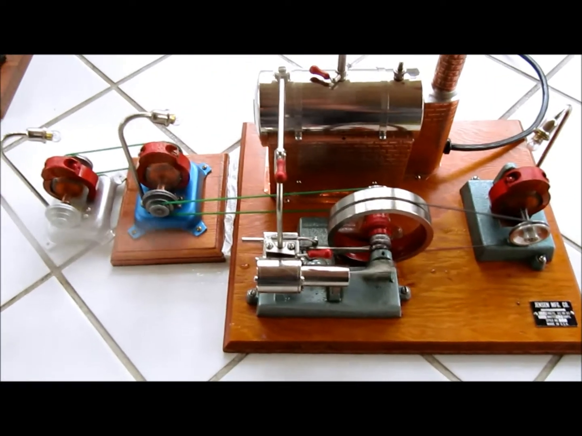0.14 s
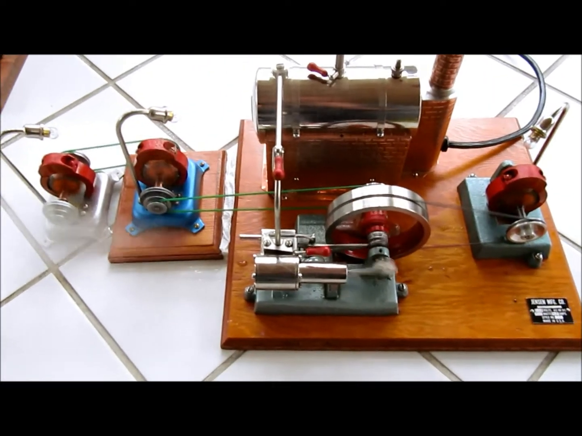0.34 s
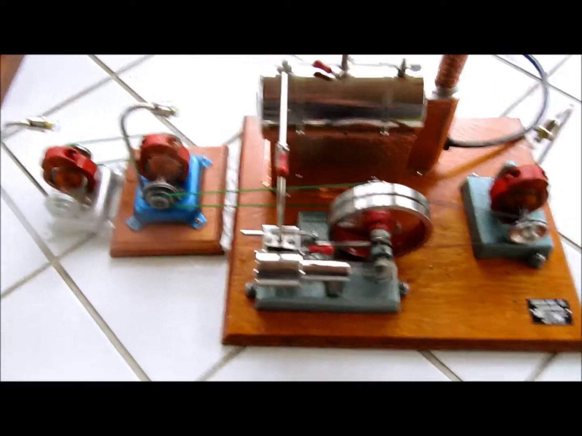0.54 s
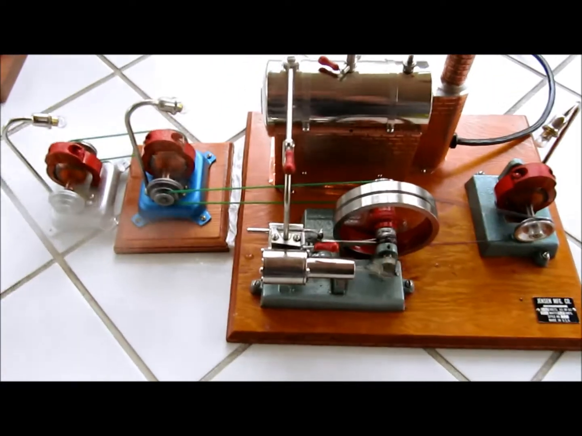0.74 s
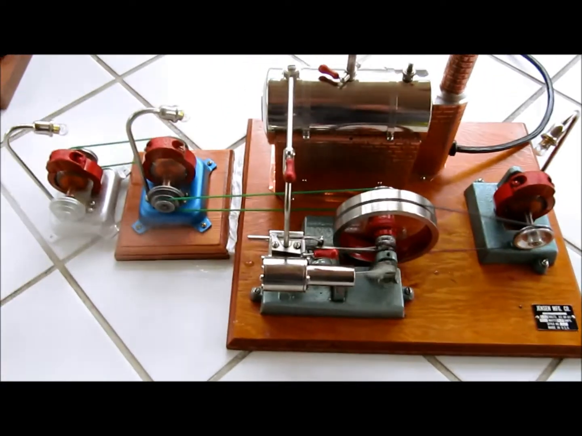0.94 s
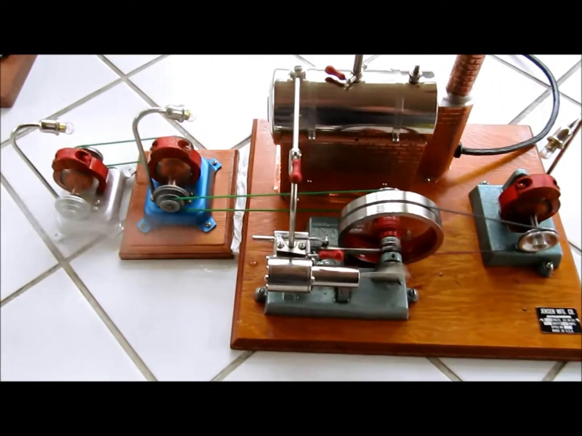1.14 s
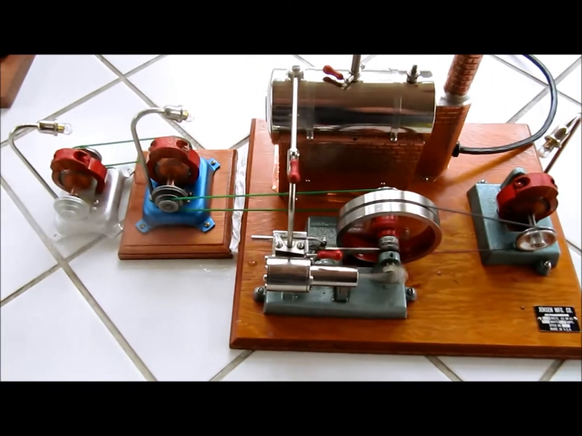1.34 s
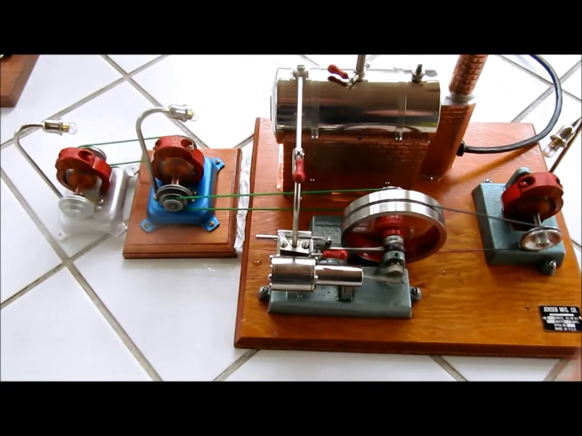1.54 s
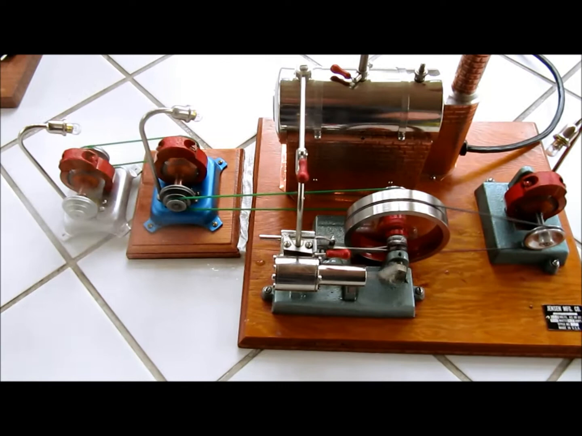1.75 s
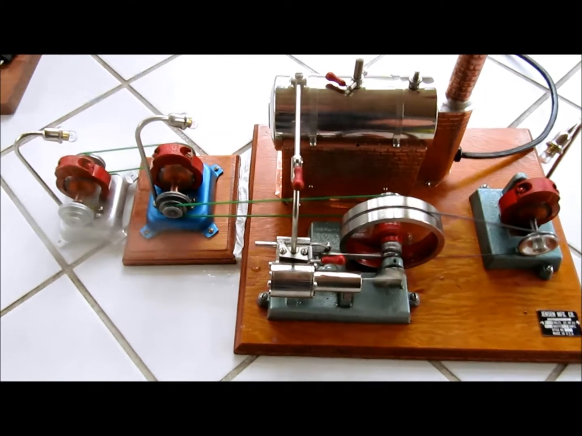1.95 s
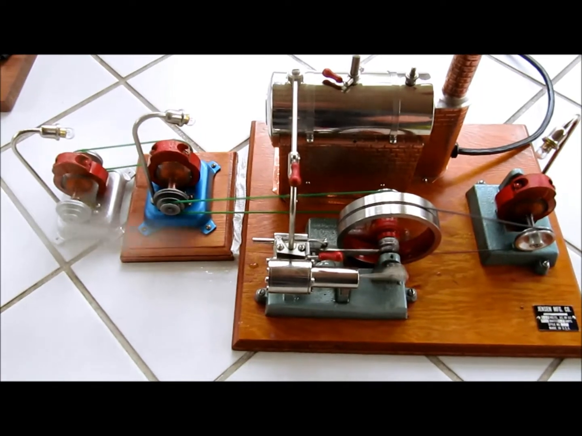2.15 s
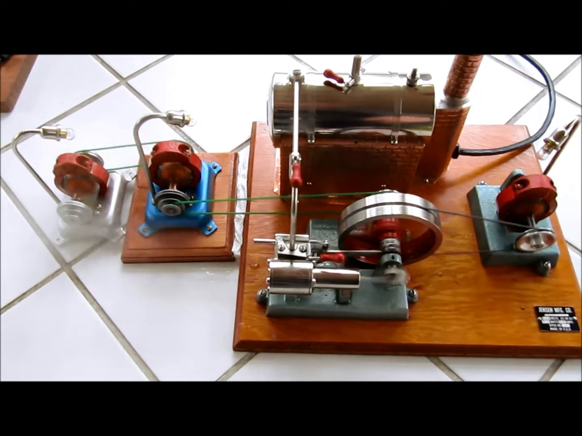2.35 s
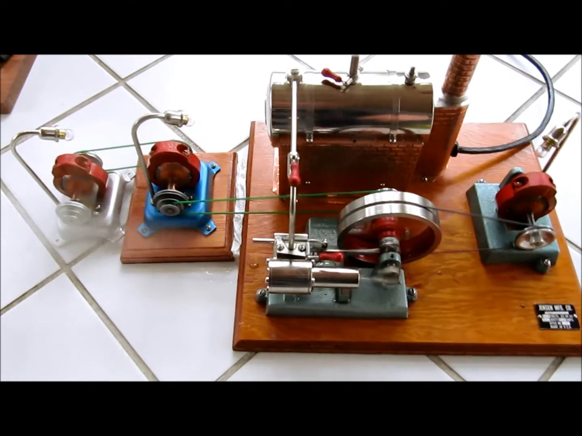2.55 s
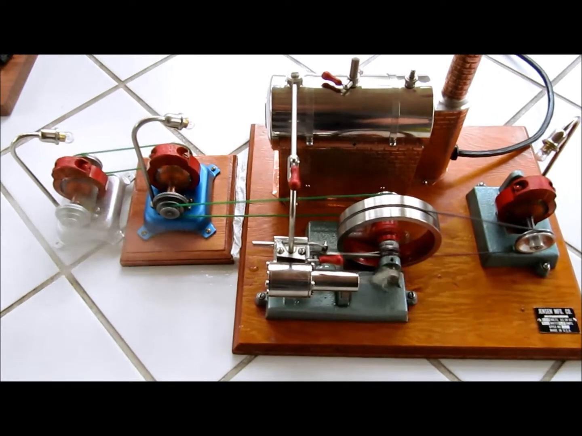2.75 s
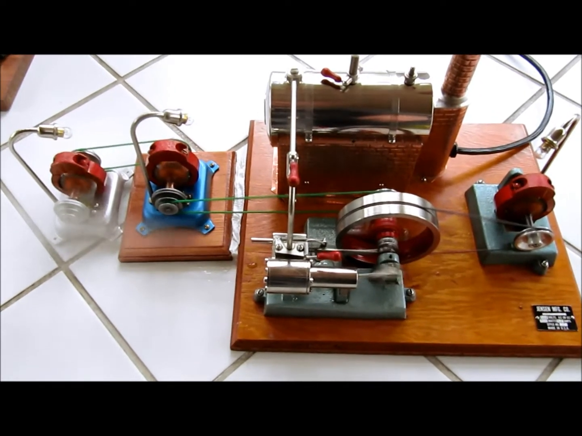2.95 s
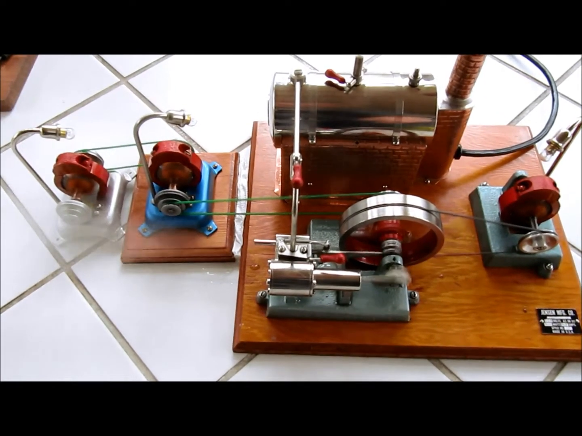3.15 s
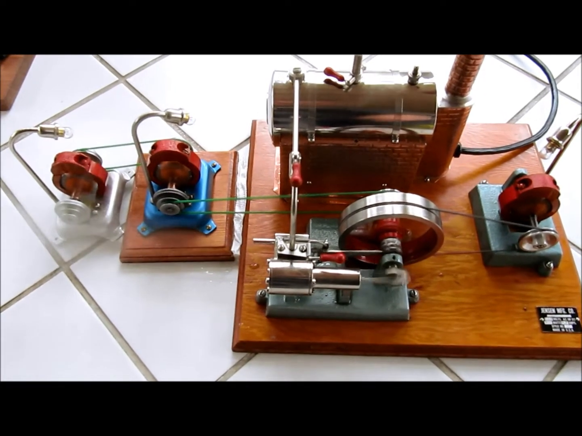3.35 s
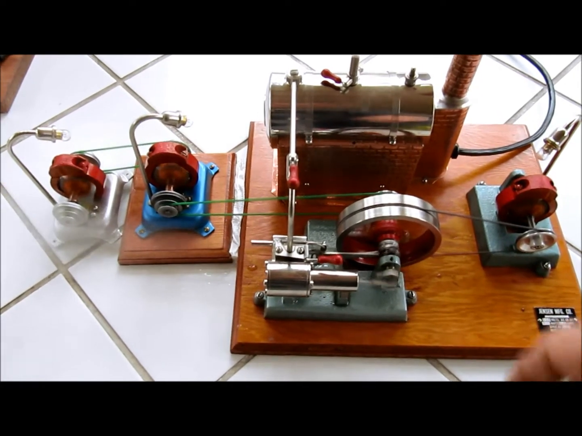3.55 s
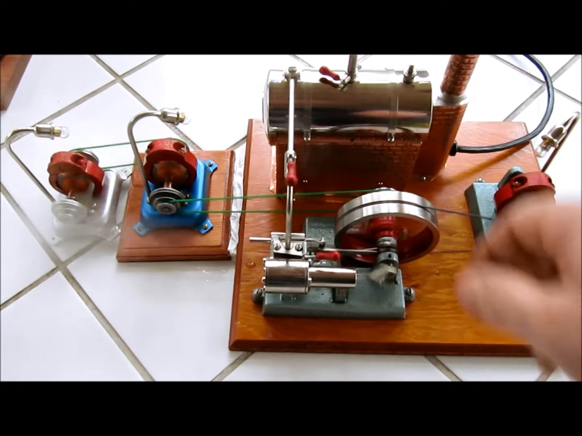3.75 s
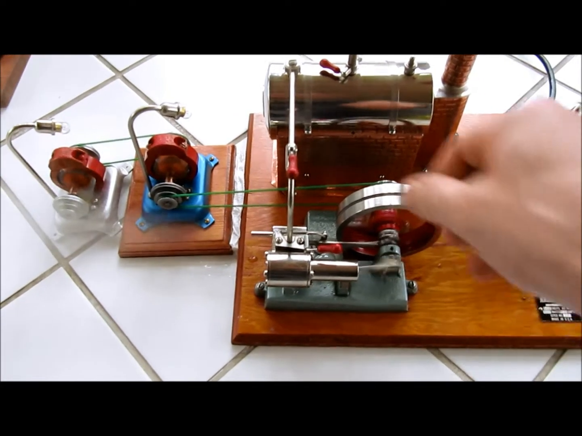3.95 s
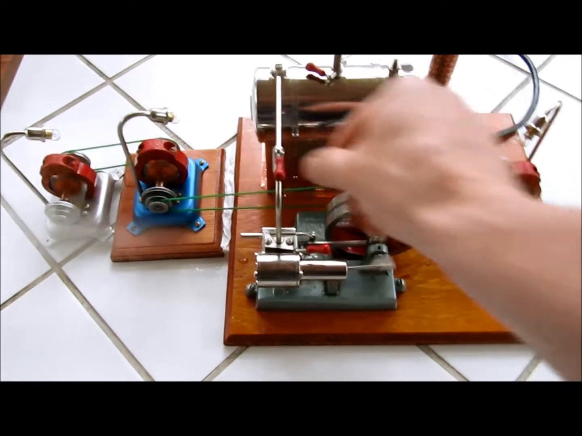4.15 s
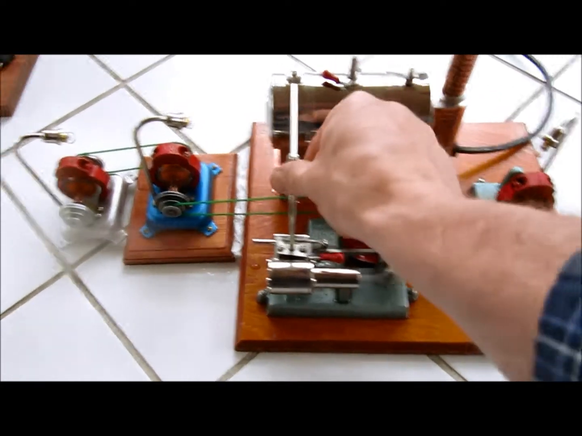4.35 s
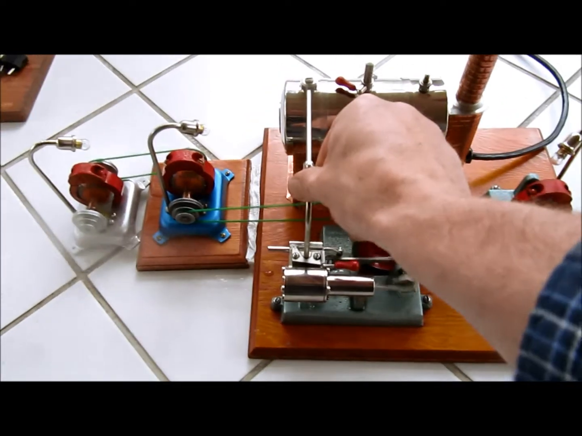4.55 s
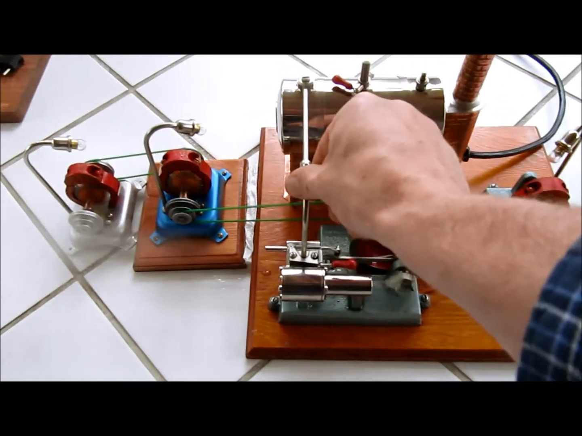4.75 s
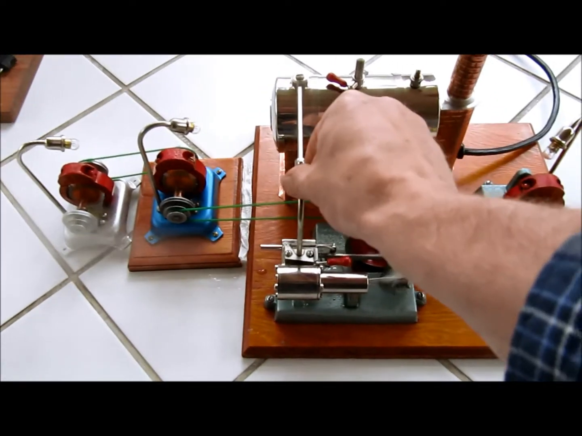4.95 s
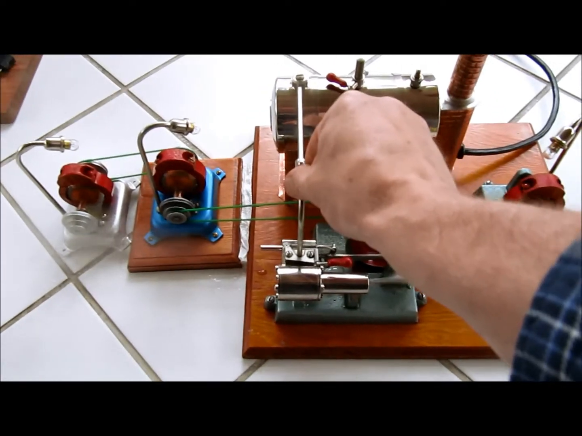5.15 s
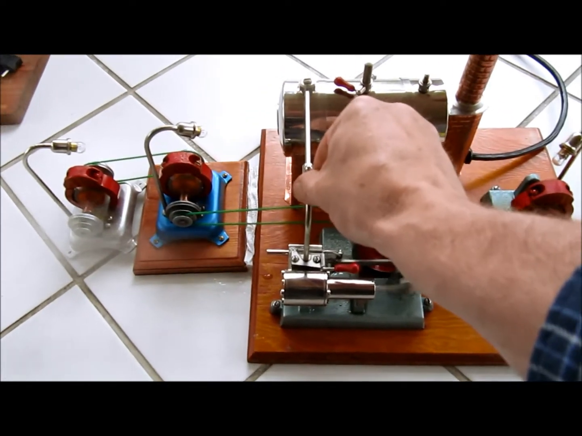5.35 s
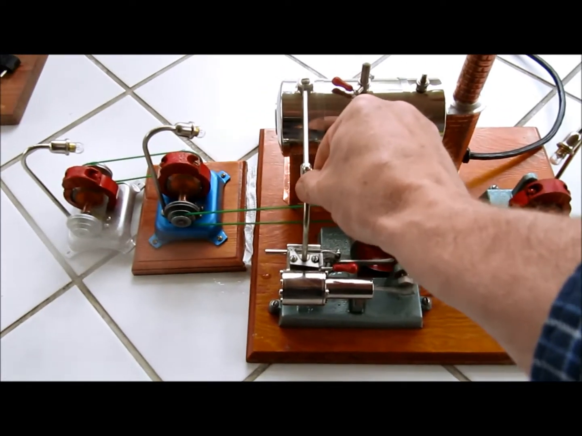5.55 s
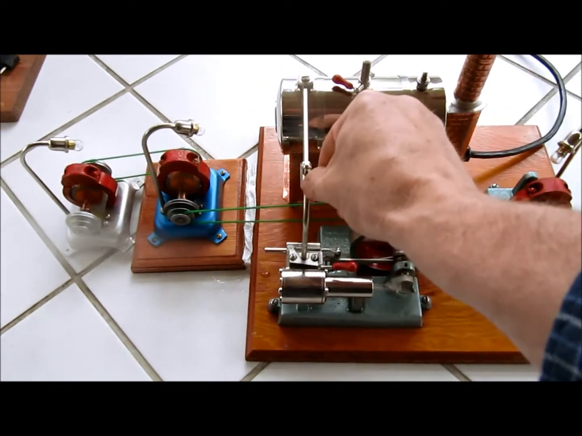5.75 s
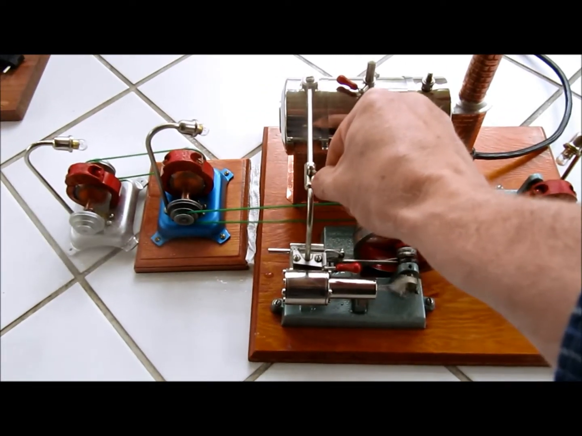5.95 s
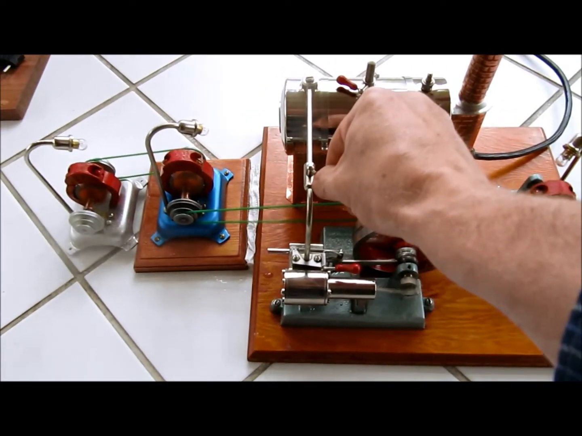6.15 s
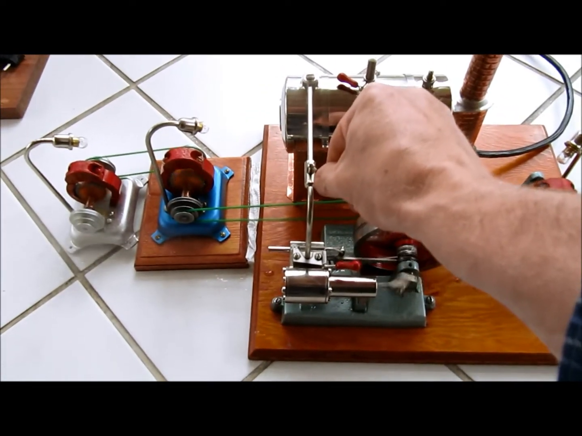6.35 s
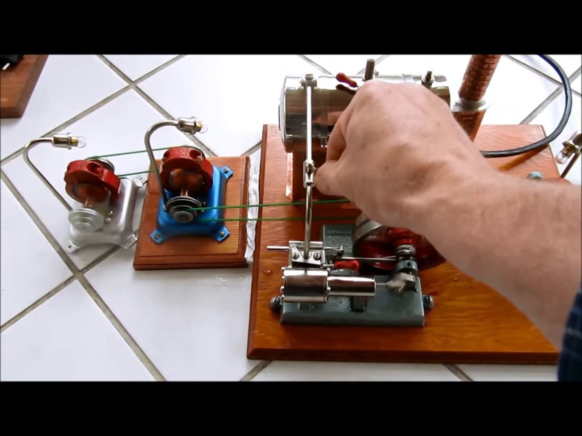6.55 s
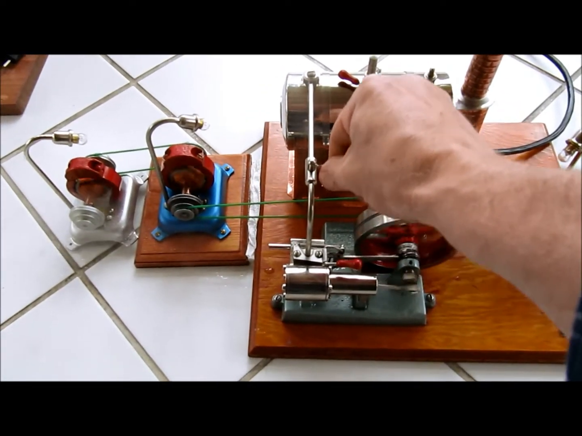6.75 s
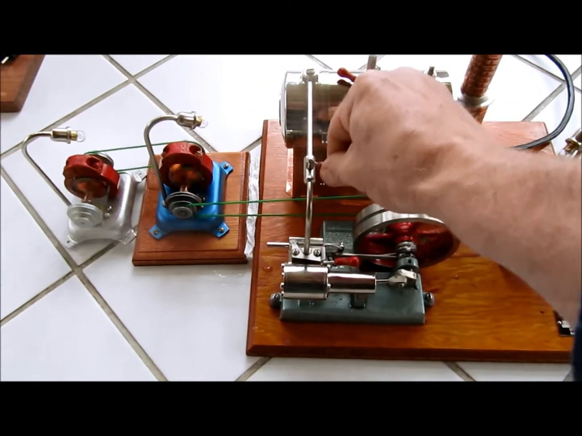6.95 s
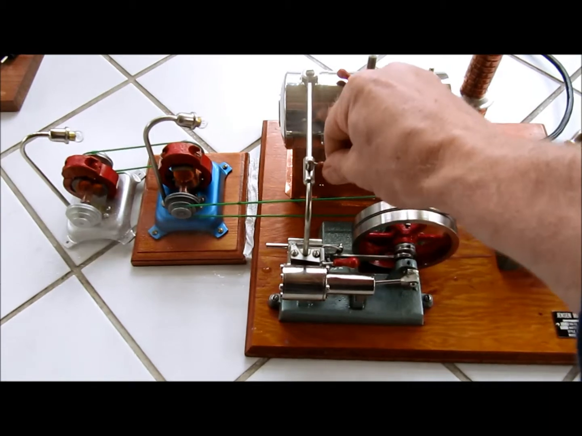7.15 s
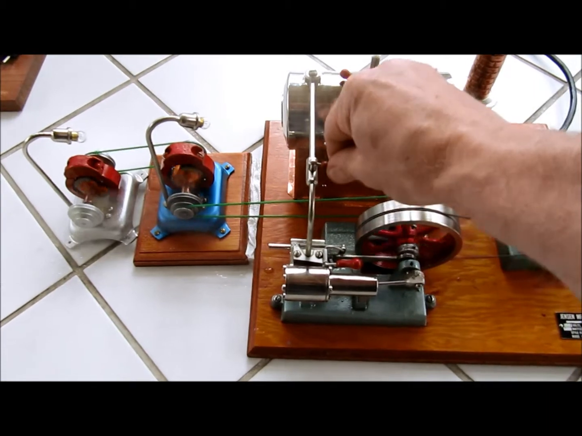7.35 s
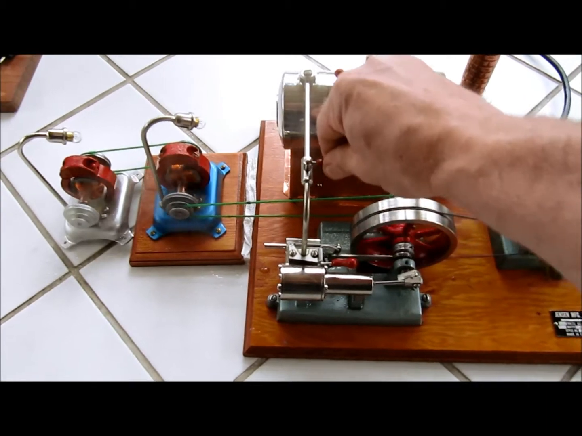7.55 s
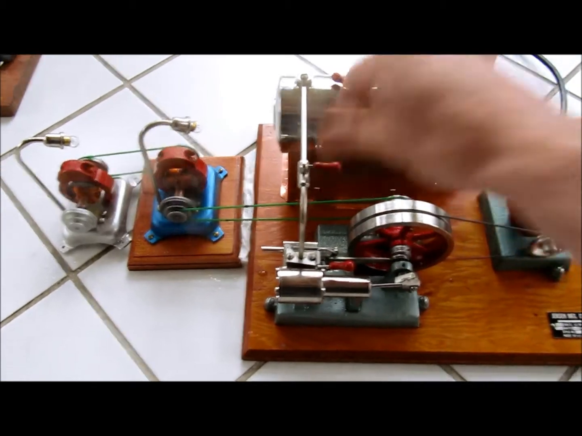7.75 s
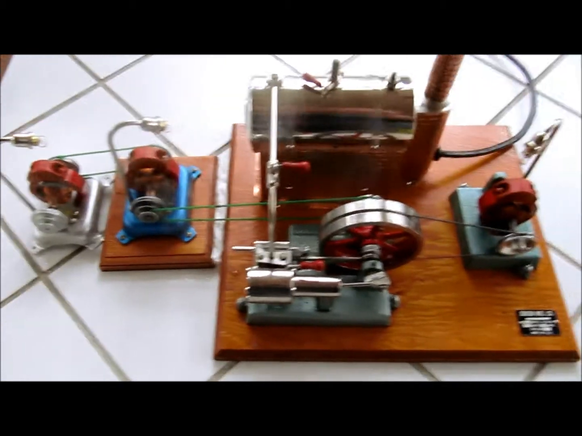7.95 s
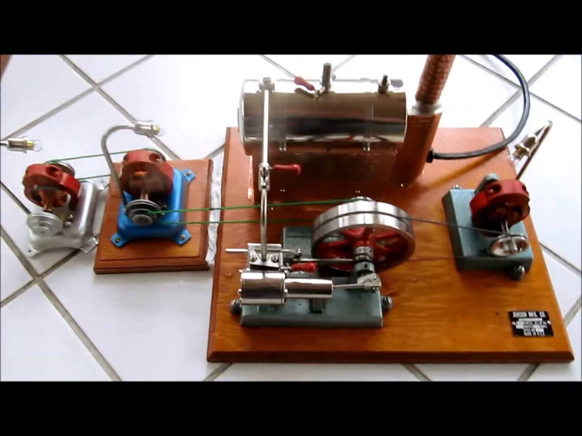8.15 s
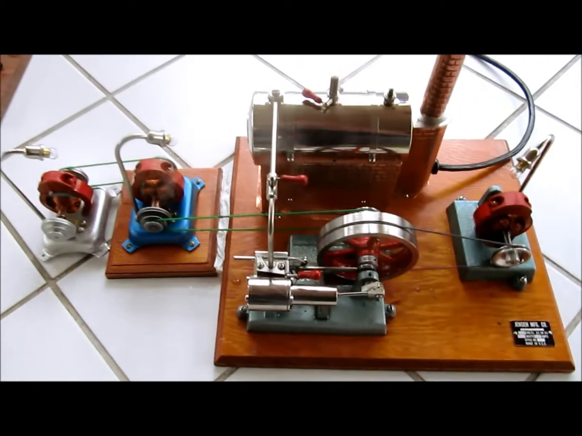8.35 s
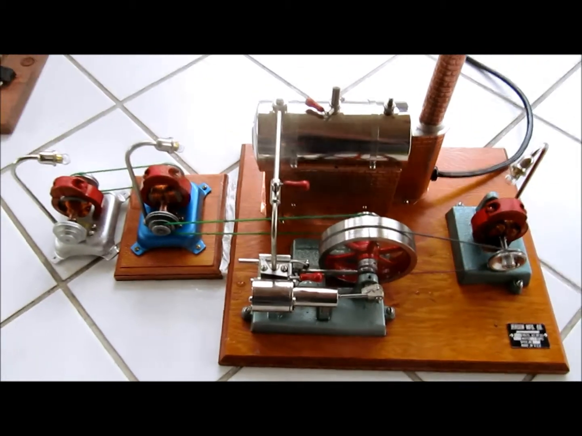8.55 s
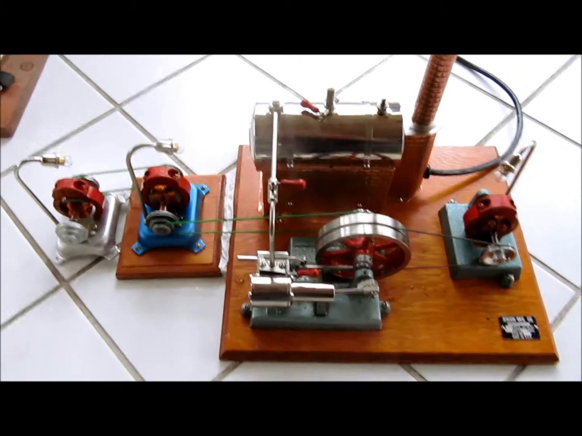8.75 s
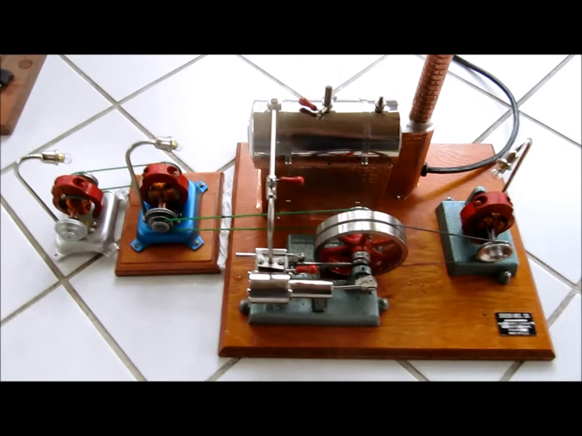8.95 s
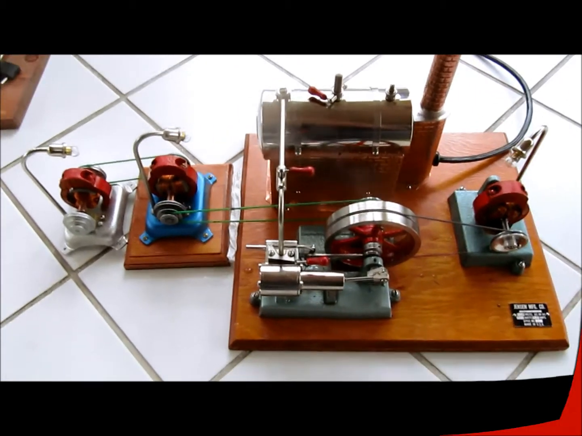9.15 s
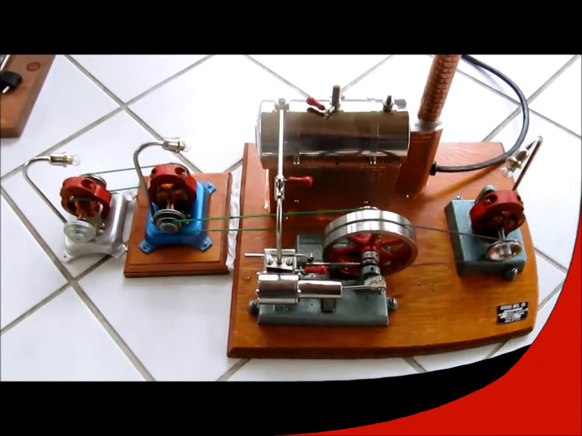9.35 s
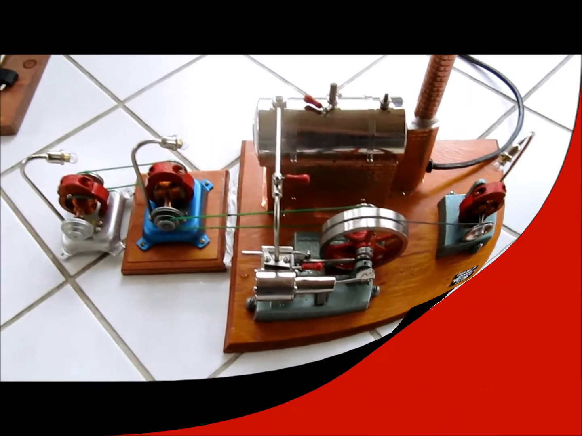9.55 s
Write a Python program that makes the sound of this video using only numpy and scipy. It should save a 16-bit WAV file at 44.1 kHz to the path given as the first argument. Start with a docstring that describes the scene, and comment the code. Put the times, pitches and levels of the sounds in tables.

```python
"""A tiled floor, and on it a wooden board with a toy steam engine at eleven turns a second.
Two exhaust ports gate hissing puffs in every turn; rod and belt drive knock at fixed crank angles.
A hand shuts the throttle and the flywheel coasts to a stop under friction and drag.
The valve sizzles briefly, a faint tone slides up, the boiler simmers on, and a plastic shell clicks."""
import sys
import numpy as np
from scipy import signal
from scipy.fft import rfft, irfft, next_fast_len
from scipy.io import wavfile

SR = 44100
rng = np.random.default_rng(int(sys.argv[2]) if len(sys.argv) > 2 else 0)


def to_wav(sig):
    """Store sig (one row per channel, or 1-D mono) as 16-bit WAV at the path in sys.argv[1].

    Samples outside -1..1 are clipped; the rate is SR.
    """
    pcm = np.clip(np.atleast_2d(sig), -1, 1) * 32767
    pcm = np.round(pcm).astype(np.int16)
    wavfile.write(sys.argv[1], SR, pcm.T)  # frames by channels


N = 427326
TIME_S = np.arange(N) / SR
FULL_SPEED_TURNS_PER_S = 11  # speed = 1

# exhaust port of each cylinder end: opens/turn, open for/turn, blowdown/dB (before a common +8),
# piston sweep/dB, sweep fall/(dB per turn), closing squeeze/dB, chuff/dB
PORTS = [(.002, 0.4, -1.73, -2.5, 14, -5.5, 1.5), (0.471, 0.48, -1.65, -3.5, 24.5, -13, -2.5)]


def amp(db):
    """Amplitude factor of a level in dB."""
    return 10 ** (np.asarray(db) / 20)


def unit(x):
    """x at rms 1."""
    return x / np.sqrt(np.mean(x ** 2) + 1e-20)


def along(points, hz):
    """(Hz, value) points interpolated on a log frequency axis."""
    f, v = np.transpose(points)
    return np.interp(np.log(hz + 1), np.log(f + 1), v)


def wobble(rate):
    """A smooth random curve, rate knots a second."""
    knots = rng.standard_normal(int(N * rate / SR) + 4)
    fine = signal.resample_poly(knots, 8, 1)
    return np.interp(np.arange(N) * rate / SR, np.linspace(0, len(knots), len(fine)), fine)


def filtered(x, response):
    """x times a response of frequency."""
    m = next_fast_len(N + SR // 2)
    return irfft(rfft(x, m) * response(np.fft.rfftfreq(m, 1 / SR)), m)[:N]


def noise(spectrum):
    """Coloured noise of rms 1."""
    return unit(filtered(rng.standard_normal(N), lambda hz: amp(along(spectrum, hz))))


def ring(x, response):
    """x through an impulse response."""
    return signal.fftconvolve(x, response)[:N]


def burst(start_s, length_s, attack_s, release_s):
    """An envelope that rises, holds until length_s has passed, and fades."""
    age = TIME_S - start_s
    return np.clip(age / attack_s, 0, 1) * np.clip(1 - (age - length_s) / release_s, 0, 1)


def in_room(x, wet_db):
    """x plus a diffuse noise tail whose decay time depends on frequency."""
    # decay of the tiled room: f/Hz, t60/s
    decay = [(200, 0.3), (2500, 0.45), (8000, 0.39), (15000, 0.11)]
    hz, t, z = signal.stft(rng.standard_normal(SR // 2), SR, nperseg=256)
    tail = signal.istft(z * amp(-60 * t / along(decay, hz)[:, None]), SR, nperseg=256)[1]
    return x + amp(wet_db) * ring(x, tail / np.linalg.norm(tail))


def off_floor(x, echo_db, delay_s, sway):
    """A floor bounce adds a delayed copy; its comb drifts as the delay wanders."""
    n = np.arange(N)
    delay = delay_s * SR * (1 + sway * wobble(1.557))
    return x + amp(echo_db) * np.interp(n - delay, n, x)


def board(blows):
    """The wooden board and what stands on it ring as a sum of decaying modes."""
    # board modes: f/Hz, level/dB, t60/s
    board_modes = [(43.4, -13, 0.27), (127, -19, .14), (156.4, -12, 0.11), (191, -11, 0.13),
                   (243, -11, 0.11), (263, -7, 0.16), (317, -1.5, 0.1), (390, -20, 0.18), (469.3, -5, 0.3),
                   (576, -3.5, 0.22), (676, -3.5, 0.2), (963, -0.5, 0.21), (1115, 0.5, 0.087)]
    t = np.arange(SR // 3) / SR
    response = sum(amp(db - 60 * t / t60) * np.sin(2 * np.pi * hz * t) for hz, db, t60 in board_modes)
    return ring(blows, response)


def background():
    """Boiler simmer with a last spurt, room murmur and low rumble; the steady three swell at the end."""
    # boiling and steam hiss: f/Hz, level/dB
    simmer_spectrum = [(2350, -44), (4000, -10), (4570, -8.5), (5180, -8), (5580, -6), (7270, -3.5),
                       (9360, 1), (10400, 0.5), (13700, -11.5), (15800, -17)]
    # room murmur: f/Hz, level/dB
    murmur_spectrum = [(47, -33), (80, -5), (283, -2.5), (429, -9), (461, 0), (533, -5), (712, -0.5),
                       (968, -3.5), (1630, -2), (1890, -6.5), (2180, 1), (2480, -6), (2910, -1.5),
                       (5010, -9), (6000, -7.5), (7800, -16), (13200, -120)]
    # low rumble: f/Hz, level/dB
    rumble_spectrum = [(15, 1.5), (40, -4), (58, -8), (80, -17), (130, -23), (300, -70)]
    swell_at_s, swell_takes_s = 7.44, 2.22  # once the engine is still
    swell = np.clip((TIME_S - swell_at_s) / swell_takes_s, 0, 1) ** 0.76
    simmer = amp(-48.5 + 8 * swell + 0.75 * wobble(60)) * noise(simmer_spectrum)
    spurt_gain = amp(-33.5) * burst(9.57, 0.087, attack_s=0.023, release_s=.04)
    spurt = spurt_gain * noise(simmer_spectrum)
    murmur = amp(-54.5 + 8.5 * swell) * noise(murmur_spectrum)
    rumble = amp(-70 + 14 * np.sqrt(swell) + 2.5 * wobble(6.5)) * noise(rumble_spectrum)
    return simmer + spurt + murmur + rumble


def shell_clicks():
    """Short dry snaps of a plastic shell: a noise crack, a few modes, a thud and a deep jolt."""
    # clicks: t/s, level/dB (before a common -1), thud/dB, crack/dB (before a common +4),
    # snap f/Hz, ring t60/s, bass jolt/dB
    clicks = [(8.578, -26, -14, -2, 4300, .024, -22), (8.5903, -10.5, -11, -3, 3850, .0072, -34),
              (8.6838, -27, -18, -6, 3800, .017, -25), (8.6897, -10.5, -33, -4.5, 3900, .012, -25),
              (9.0635, -20.5, -12, -7, 4520, .024, -23), (9.239, -36.5, -17, -10, 4500, .03, -14),
              (9.378, -20.5, 4.5, -3, 4330, .0097, -28), (9.508, -28.5, -20, 0, 4440, .012, -17),
              (9.671, -29, 2, 7, 4200, .012, -30)]
    # shell modes: f/Hz, level/dB (varied by about 1 dB in each click)
    shell_modes = [(1150, -13), (1900, -10), (2300, -4), (2600, -4.5), (3350, -3), (4800, -6), (6200, -20)]
    jolt_hz, jolt_t60_s = 32, .25
    crack_band = signal.butter(1, [1200, 7500], "bandpass", fs=SR, output="sos")
    out, t = np.zeros(N + SR), np.arange(SR // 4) / SR
    onset = 1 - np.exp(-t / 0.00013)
    for s, db, thud_db, crack_db, snap_hz, t60, jolt_db in clicks:
        modes = shell_modes + [(560, thud_db), (snap_hz, 0)]
        body = sum(amp(level + rng.normal()) * np.sin(2 * np.pi * (hz * t + rng.random()))
                   for hz, level in modes)
        grit = signal.sosfilt(crack_band, rng.standard_normal(len(t)))
        crack = amp(crack_db + 4 - 60 * t / 0.0094) * grit
        jolt = amp(jolt_db - 60 * t / jolt_t60_s) * np.sin(2 * np.pi * jolt_hz * t)
        click = (body * amp(-60 * t / t60) + crack + jolt) * onset
        out[round(s * SR):][:len(t)] += amp(db - 1.0) * click
    return out[:N]


def moan():
    """A faint, airy tone, its amplitude random, slides up ever faster as the engine comes to rest."""
    start_s, length_s, from_hz, to_hz = 7.15, .53, 470, 800
    progress = np.clip((TIME_S - start_s) / length_s, 0, 1)
    hz = from_hz + (to_hz - from_hz) * progress ** 2.3
    airy = wobble(170) * np.sin(2 * np.pi * np.cumsum(hz) / SR)
    return amp(-59.5) * burst(start_s, length_s, attack_s=0.045, release_s=.03) * airy


def throttle():
    """Fingers bump the lever, exciting board and rattle; steam sizzles in a narrow band at the valve."""
    # lever bumps: t/s, board thud/dB, rattle/dB
    bumps = [(6.457, -68, -44), (6.66, -63, -43), (6.802, -56, -37.5), (6.827, -64, -45), (7.745, -52, -49)]
    # lever rattle: f/Hz, level/dB
    lever_spectrum = [(200, -4), (500, 3), (1050, -9), (1600, -6), (2400, 5), (4200, -5), (6500, -14),
                      (12000, -30)]
    # valve sizzles: t/s, length/s, level/dB
    sizzles = [(6.804, .26, -48.5), (7.07, .19, -49)]
    thuds, rattles = np.zeros(N), np.zeros(N)
    for s, thud_db, rattle_db in bumps:
        thuds[round(s * SR)] = amp(thud_db)
        rattles[round(s * SR)] = amp(rattle_db)
    t = np.arange(SR // 4) / SR
    rattle = ring(rattles, amp(-60 * t / 0.064)) * noise(lever_spectrum)
    slit = noise([(4000, -36), (5300, 1.5), (5800, -3), (6250, 2), (7000, -37)])
    leak = sum(amp(db) * burst(s, length_s, attack_s=0.03, release_s=0.034)
               for s, length_s, db in sizzles)
    return in_room(board(thuds) + rattle, wet_db=-2) + leak * slit


def belt_drive(turns, speed):
    """Flywheel and generators hum at multiples of the crank rate; belts and bearings whirr as noise."""
    # hum: multiple of the crank rate, level/dB
    orders = [(2, -2.5), (4, -4.5), (6, -17), (11, -8.5), (14, -1.5), (16, -7), (21, -5), (24, -3.5),
              (35, 0.5), (42, 2.5)]
    # belts and bearings: f/Hz, level/dB
    whirr_spectrum = [(80, -30), (130, -6.5), (290, 0.5), (420, -16), (620, 4), (850, -5), (1120, 5.5),
                      (1500, -13), (2300, 3.5), (2850, -4), (3400, 8.5), (5000, -11), (9000, -27)]
    hum = sum(amp(db + 0.71 * wobble(4.58)) * np.sin(2 * np.pi * order * turns) for order, db in orders)
    return amp(-62.5) * speed ** 2 * hum + amp(-46.0) * speed ** 0.91 * noise(whirr_spectrum)


def linkage(turns, speed):
    """Rod and belt drive take up slack near the same crank angles in every turn, harder at speed."""
    # play in the linkage: crank angle/turn, board thud/dB, metal clack/dB
    knocks = [(.176, -9, 0), (.38, 4, -5), (0.794, 0.5, -6.5), (.822, -10, -3)]
    # metal clack: f/Hz, level/dB
    clack_spectrum = [(150, -6.5), (350, -2.5), (650, -0.5), (1150, -0.5), (1800, -2.5), (4000, -5),
                      (9000, -36)]
    jitter_s = 0.00013
    thuds, clacks = np.zeros(N), np.zeros(N)
    for angle, thud_db, clack_db in knocks:
        at = np.flatnonzero(np.diff(np.floor(turns - angle)) > 0)
        force = speed[at] ** 1.7 * amp(0.7 * rng.standard_normal(len(at)))
        jitter = (jitter_s * SR * rng.standard_normal(len(at))).astype(int)
        at = np.clip(at + jitter, 0, N - 1)
        thuds[at] += force * amp(thud_db)
        clacks[at] += force * amp(clack_db)
    t = np.arange(SR // 10) / SR
    clatter = ring(clacks, amp(-60 * t / 0.018)) * noise(clack_spectrum)
    return amp(-57.5) * board(thuds) + in_room(amp(-35.0) * clatter, wet_db=-5.5)


def flywheel(shut):
    """Turns and relative speed: a slight sag under steam, then dry friction and drag as the throttle shuts."""
    start_turn, start_turns_per_s = .275, 11.1211
    sag_per_s = .0358  # turns/s lost each second as the boiler tires
    friction, drag_per_s = 4.2317, .8344  # friction in turns/s lost each second; drag of the belts
    driven = start_turns_per_s - sag_per_s * TIME_S
    coasted_s = np.cumsum(shut) / SR
    offset = friction / drag_per_s
    rate = np.maximum((driven + offset) * np.exp(-drag_per_s * coasted_s) - offset, 0)
    return start_turn + np.cumsum(rate) / SR, rate / FULL_SPEED_TURNS_PER_S


def steam_flow(turns, speed, opening_turns, closing_turns, empty_s, sweep_power):
    """Each port opens, the cylinder blows down, and the piston sweeps out the rest."""
    power = np.zeros(N)
    for opens, dwell, blow_db, sweep_db, fall_db, squeeze_db, _ in PORTS:
        angle = (turns - opens) % 1
        full_open = opening_turns * (speed + 0.033) ** 0.07  # a slow engine needs only a narrow slit
        port = np.clip(angle / full_open, 0, 1) * np.clip((dwell - angle) / closing_turns, 0, 1)
        # open time weighted by port opening; the cylinder refills while the port is shut
        vented_s = np.cumsum(port) / SR + angle[0] / FULL_SPEED_TURNS_PER_S
        vented_s -= np.maximum.accumulate(vented_s * (port == 0))
        blowdown = amp(blow_db + 8) * np.exp(-vented_s / empty_s)
        sweep = amp(sweep_db - fall_db * angle) * speed ** sweep_power
        narrowing = np.exp(-((dwell - .063 - angle) / 0.021) ** 2)  # the narrowing slit hisses again
        squeeze = amp(squeeze_db) * speed ** 1.35 * narrowing
        power += port ** 2 * (blowdown ** 2 + sweep ** 2 + squeeze ** 2)
    return np.sqrt(power)


def pipe_flow(turns, speed, swell_turns):
    """Behind each port the flow in the pipe swells and ebbs more slowly than the jet."""
    flow = np.zeros(N)
    for opens, *_, chuff_db in PORTS:
        age = (turns - opens) % 1 / (swell_turns * np.sqrt(speed + .01))
        flow += amp(chuff_db) * (age * np.exp(1 - age)) ** 1.36
    return flow * speed ** 0.49


def jet_noise(covered, strong, drift_db):
    """Resonant noise bands, each waxing and waning as the plume shifts, scaled to unit power."""
    # jet resonances: f/Hz, width/Hz, in the open/dB, under the hand/dB, with weak steam/dB
    resonances = [(4860, 1120, -22.5, -17.5, -32), (6030, 280, -19.5, -37, -31),
                  (6820, 490, -13.5, -10, -10), (7340, 505, -1.5, -4, -3.5), (7830, 410, -1.5, -7.5, 2),
                  (8740, 1020, -7.5, -6.5, -5.5), (9930, 480, -4.5, -5.5, -12), (10780, 430, -5, -6.5, -13),
                  (11405, 600, -1.5, -1.5, -8.5), (12460, 260, -2.5, -15, -9), (12770, 340, -17, -7.5, -18),
                  (13800, 550, -13, -15.5, -22), (15500, 1400, -21, -22, -30)]
    jet, power = np.zeros(N), np.zeros(N)
    for hz, width, open_db, hand_db, weak_db in resonances:
        strong_db = (1 - covered) * open_db + covered * hand_db
        db = strong * strong_db + (1 - strong) * weak_db
        gain = amp(db + drift_db * wobble(2.48)) * np.sqrt(width)
        band = filtered(rng.standard_normal(N), lambda f: 1 / (1 + (1.56 * (f - hz) / width) ** 2))
        jet += gain * unit(band)
        power += gain ** 2
    return jet / np.sqrt(power)


def exhaust(turns, speed, shut):
    """Steam drives a spitting bright jet and the pipe's hollow chuff; both weaken as the throttle shuts."""
    # hand at the jet: t/s, share of the jet covered
    hand = [(3.7, 0.065), (4.4, 0.92)]
    # hollow chuff of the exhaust pipe: f/Hz, level/dB
    chuff_spectrum = [(150, -23), (330, -14.5), (620, -9.5), (850, -15.5), (1130, -4), (1500, -12.5),
                      (1850, -3), (2080, -3.5), (2300, 3.5), (2460, -2), (2610, 3.5), (2900, -6), (3300, 1),
                      (4000, -4), (5300, -3.5), (9000, -11.5)]
    # rasp of wet steam: f/Hz, level/dB
    rasp_spectrum = [(300, -14), (1100, -8.5), (1500, -8), (2300, -1), (2800, -2.5), (3500, 2.5),
                     (4500, -2), (6000, -4), (9000, -20)]
    steam = amp(0.4 * wobble(25) + 0.43 * wobble(3.01))
    covered = np.clip(np.interp(TIME_S, *np.transpose(hand)), 0, 1)
    strong = np.clip((speed - .55) / 0.45, 0, 1)  # weak steam hisses lower

    flow = steam_flow(turns, speed, opening_turns=0.1, closing_turns=0.04, empty_s=0.0051, sweep_power=5.0)
    spit = amp(1.5 * wobble(600))  # droplets in the wet steam
    jet_gain = amp(-18 - 1 * shut - 0.03 * covered)
    jet = jet_gain * steam * flow * spit * jet_noise(covered, strong, drift_db=0.9)
    jet = off_floor(jet, echo_db=-15, delay_s=.0019, sway=0.039)

    # the hand's hollow rings along
    cupped = amp(-11.0) * covered * noise([(3600, -21.0), (4500, 0), (5400, -0.5), (5900, -14)])
    hollow = amp(-34 - 4 * shut - 2 * covered) * (noise(chuff_spectrum) + cupped)
    clears_s = 0.64  # water in the pipe is soon blown out
    rasp = amp(-31.5) * np.exp(-(TIME_S / clears_s) ** 2) * noise(rasp_spectrum)
    puffs = steam * pipe_flow(turns, speed, swell_turns=0.12) * amp(1.6 * wobble(250))
    chuff = puffs * (hollow + rasp)
    return in_room(jet, wet_db=-11.5) + in_room(chuff, wet_db=-7.5)


def scene():
    """The throttle sets the flywheel's angle and speed, which drive exhaust, linkage and belts."""
    shut_at_s, shut_takes_s = 5.7109, .4716
    shut = np.clip((TIME_S - shut_at_s) / shut_takes_s, 0, 1)
    turns, speed = flywheel(shut)
    engine = exhaust(turns, speed, shut) + linkage(turns, speed) + belt_drive(turns, speed)
    return (background() + shell_clicks() + moan() + throttle() + engine)[None]


def record(dry):
    """A sharp band limit: nothing at or above 15.8 kHz remains."""
    return filtered(dry[0], lambda hz: hz < 15800)[None]


dry = scene()
out = record(dry)
to_wav(out)
```